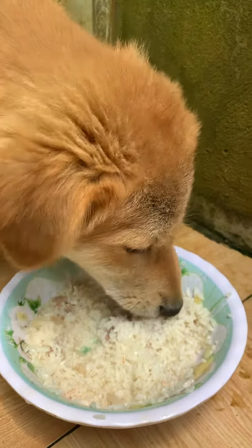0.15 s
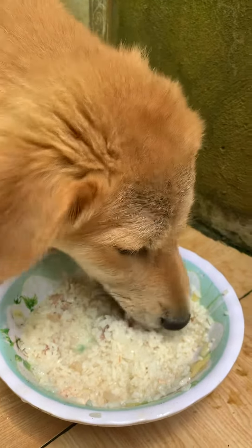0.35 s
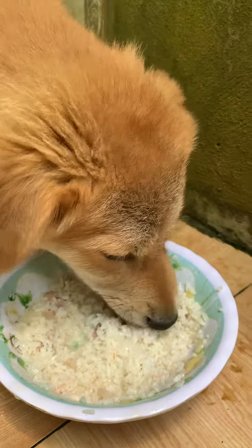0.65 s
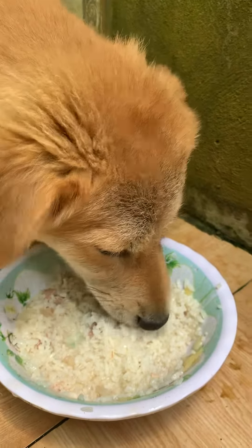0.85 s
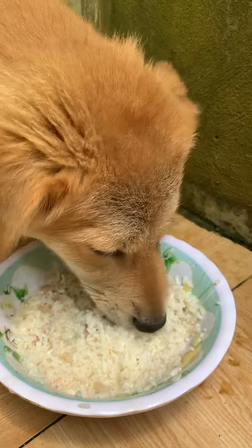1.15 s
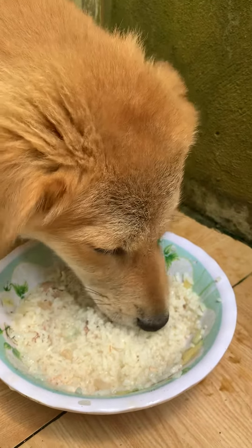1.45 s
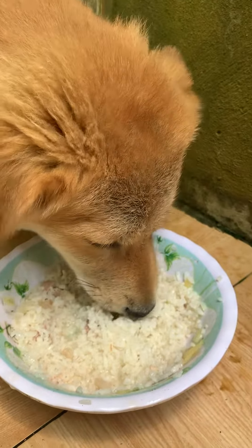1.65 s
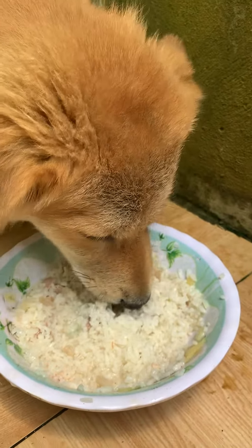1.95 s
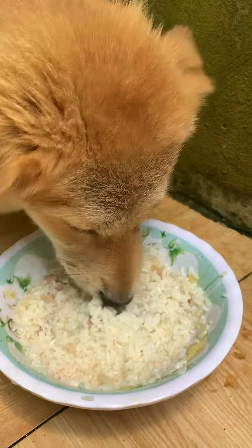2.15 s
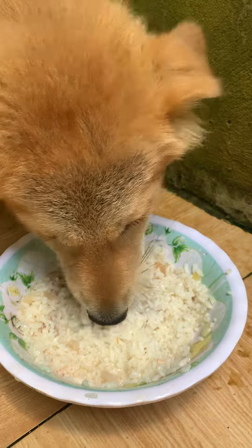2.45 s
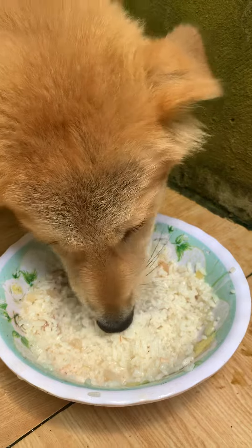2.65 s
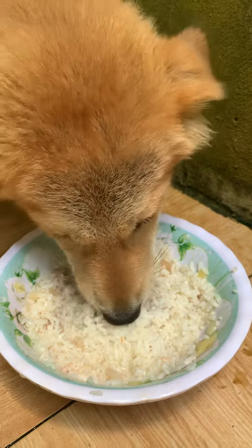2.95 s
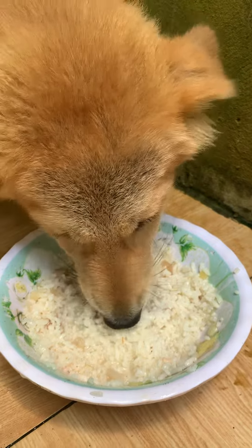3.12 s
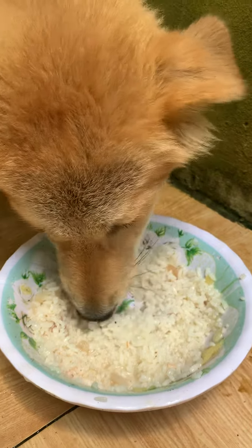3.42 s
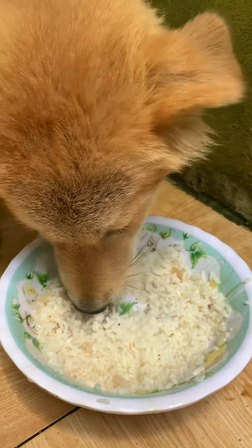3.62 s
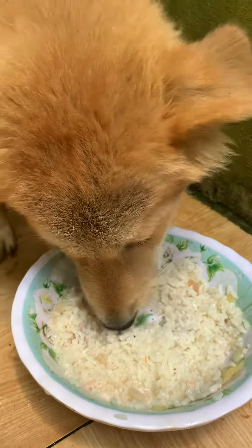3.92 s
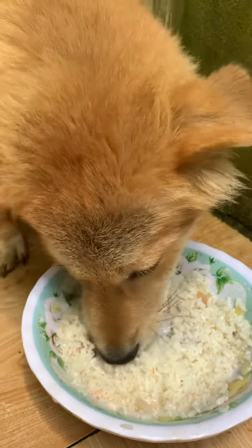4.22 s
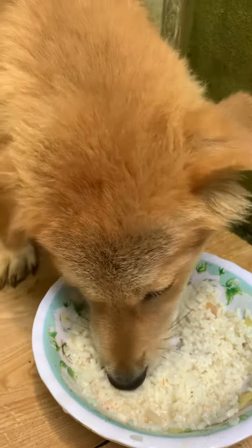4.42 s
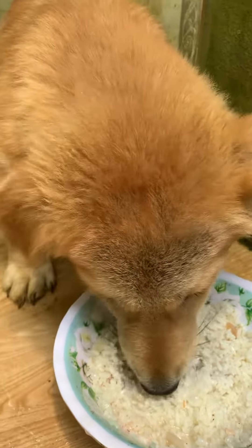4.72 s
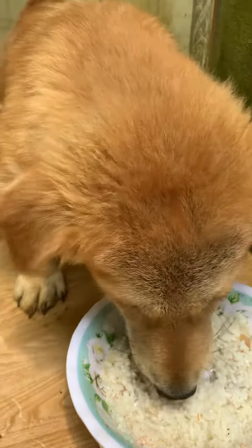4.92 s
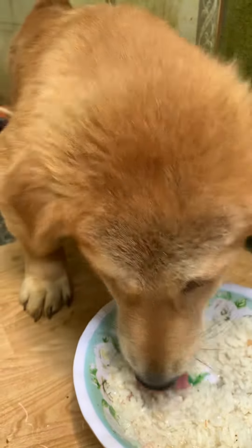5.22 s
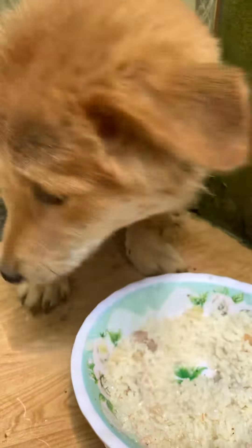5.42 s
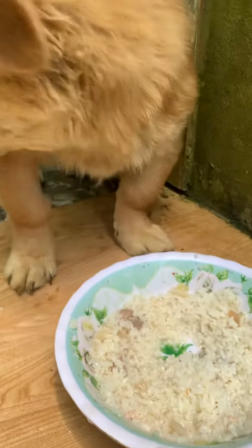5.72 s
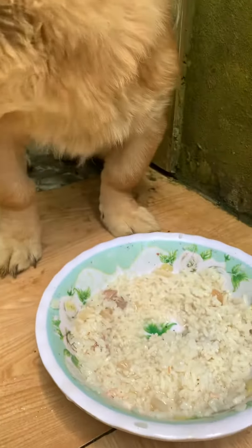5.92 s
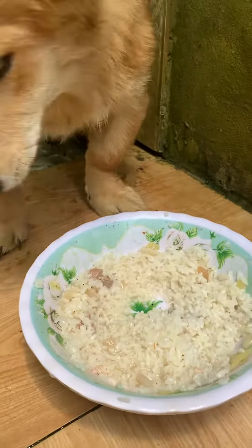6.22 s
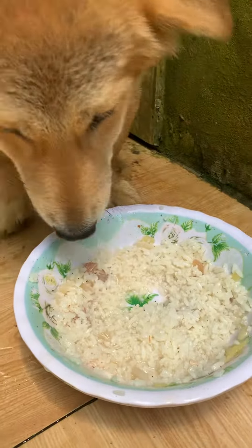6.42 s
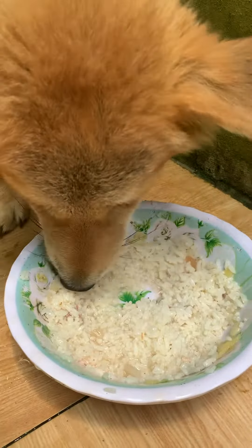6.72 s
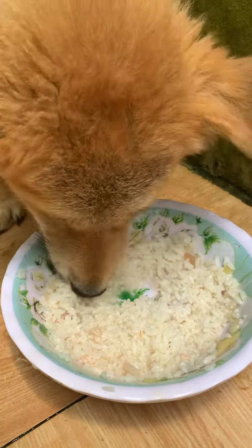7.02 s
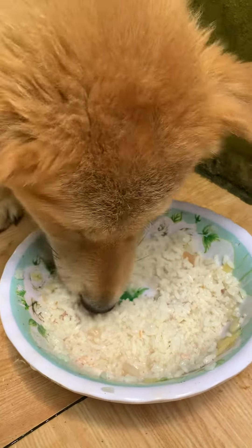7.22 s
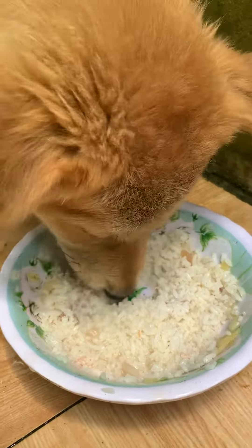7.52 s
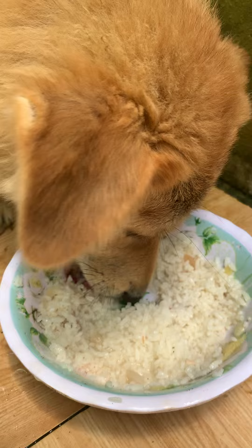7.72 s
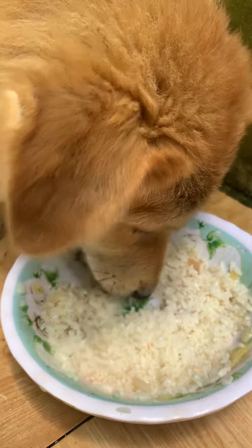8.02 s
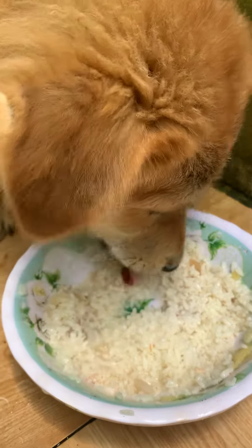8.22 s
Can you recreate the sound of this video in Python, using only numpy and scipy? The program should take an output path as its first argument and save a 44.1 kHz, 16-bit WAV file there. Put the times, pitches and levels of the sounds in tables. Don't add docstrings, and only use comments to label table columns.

```python
import sys
import numpy as np
from scipy import signal
from scipy.fft import rfft, irfft, next_fast_len
from scipy.io import wavfile
from scipy.ndimage import uniform_filter1d

SR = 44100
rng = np.random.default_rng(int(sys.argv[2]) if len(sys.argv) > 2 else 0)


def linear_from_db(decibels):
    return 10 ** (np.asarray(decibels, float) / 20)


def file_out(sig):
    cols = np.atleast_2d(sig).T
    lim = np.clip(cols, -1, 1)
    pcm = np.round(lim * 32767).astype(np.int16)
    wavfile.write(sys.argv[1], SR, pcm)


N = 368656
T = np.arange(N) / SR
HZ = np.maximum(np.fft.rfftfreq(N, 1 / SR), 1)

# time [s], peak level [dB], cavity pitch [Hz].
TONGUE_DRAGS = [(0.881, -44, 1090), (1.462, -37, 1200), (1.827, -36, 1620), (1.987, -48, 720),
                (1.738, -37, 1490), (2.012, -42, 900), (3.764, -38, 1450), (2.203, -43.5, 870),
                (2.289, -39.5, 1050), (3.193, -36, 1516), (3.383, -37, 1870), (3.466, -29.5, 1540),
                (3.573, -42, 1465), (3.664, -34, 1150), (3.748, -29, 1390), (4.755, -44, 1462),
                (4.902, -45, 1630), (5.025, -40, 1400), (5.052, -35, 1000), (5.232, -40, 720),
                (5.653, -50, 1320), (5.735, -47, 1430), (5.961, -43, 710), (7.447, -40, 1115),
                (7.662, -43, 930), (8.287, -44, 651)]
# centre [Hz], width [Hz], level [dB].
MOUTH_MODES = [(780, 215, 0), (1100, 173, 0), (1450, 210, -0.5), (1780, 200, -5), (2400, 410, 1.5)]
# time [s], firing rate [Hz], load level [dB].
VEHICLE = [(0, 31.94, -34.5), (1, 33.17, -39.5), (2, 34.05, -35), (2.5, 34.36, -38.5), (2.9, 34.52, -46),
           (3.9, 34.45, -44), (4.6, 37.36, -37.5), (5.2, 39.17, -39.5), (5.8, 42.18, -39.5),
           (6.3, 44.5, -44.5), (6.9, 49.3, -35.5), (7.2, 52.1, -40), (7.5, 47.95, -40.5), (7.8, 45.5, -67)]


def rms_one(x):
    return x / np.sqrt(np.mean(x ** 2) + 1e-20)


def in_time(rows):
    s, *columns = np.transpose(rows)
    return [np.interp(T, s, c) for c in columns], (T >= s[0]) & (T <= s[-1])


def at_hz(points):
    hz, values = np.transpose(points)
    return np.interp(np.log(HZ), np.log(hz), values)


def bells(rows, hz):
    return sum(db / (1 + (2 * (hz - centre) / width) ** 2) for centre, width, db in rows)


def bumps(rows):
    return sum(db * np.exp(-((T - s) / half_s) ** 2) for s, db, half_s in rows)


def drift(rate):
    r = np.exp(-80 * np.pi * rate / SR)
    slow = signal.lfilter([1], [1, -2 * r, r * r], rng.standard_normal(N // 40 + 2002))[2000:]
    return np.interp(np.arange(N) / 40, np.arange(len(slow)), rms_one(slow))


def diffuse_noise(colour):
    # frequency [Hz], left-right likeness [0-1].
    likeness = [(60, .99), (250, .9), (450, .3), (750, .8), (1000, .45), (1300, .7), (1500, .88),
                (2200, .68), (3300, .66), (4150, .82), (4400, .97), (4650, .99), (5100, .995), (5300, .86),
                (6100, .86), (7400, .97), (7700, .84), (8250, .88), (8550, .99), (9300, .99), (9600, .87),
                (10300, .87), (10600, .97), (12000, .82), (15000, .85)]
    shared, apart = rfft(rng.standard_normal((2, N)))
    alike = np.clip(at_hz(likeness), 0, 1)
    pair = np.sqrt(1 + alike) * shared + np.sqrt(1 - alike) * apart * [[1], [-1]]
    return rms_one(irfft(colour * pair, N))


def resonate(x, hz, width_hz):
    r = np.exp(-np.pi * width_hz / SR)
    return signal.lfilter([1, 0, -1], [1, -2 * r * np.cos(2 * np.pi * hz / SR), r * r], x)


def add(out, s, db, sound):
    i = round(s * SR)
    out[i:i + len(sound)] += (linear_from_db(db) * sound / np.abs(sound).max())[:N - i]


def bites():
    # time [s], peak level [dB], cavity pitch [Hz], broad slap [dB].
    lip_pops = [(0.116, -30.5, 1900, -33), (0.402, -33, 1550, 17), (0.587, -39, 1480, 24),
                (0.683, -35.5, 1490, -16), (0.985, -32.5, 1480, -5), (1.009, -31.5, 1440, -17),
                (1.1, -38, 1450, 19), (1.733, -30, 640, 13), (1.816, -30, 1570, -23),
                (1.959, -38.5, 751, -1), (1.999, -24.5, 850, 32), (2.485, -36.5, 1379, 21),
                (2.52, -20, 1450, 22), (2.654, -30.5, 1570, -24), (2.709, -37, 1600, -4),
                (2.779, -33, 1010, -25), (2.805, -29.5, 1770, 16), (2.843, -33, 1260, 27),
                (3.122, -36, 720, -3), (3.331, -29, 749, 22), (3.583, -35.5, 1100, -4.5),
                (4.151, -37.5, 1100, -9), (4.283, -37, 1160, -25), (4.662, -36.5, 1450, 4),
                (4.946, -34.5, 1710, 19), (6.56, -35.5, 1100, -3), (6.77, -39.5, 691, -23),
                (7.203, -27, 1520, -10), (7.47, -33.5, 1570, 3), (8.03, -28.5, 1450, 10),
                (2.107, -28.5, 1380, 13), (2.118, -23, 1350, 8), (7.208, -41.5, 1150, -8),
                (2.009, -33, 900, 7), (2.529, -40.5, 1050, 9), (4.261, -48, 1120, -3)]
    # time [s], peak level [dB], cavity
    # pitch [Hz].
    light_licks = [(0.039, -46, 1200), (0.306, -45, 1170), (1.315, -49, 1350), (1.689, -50, 752),
                   (2.535, -36, 1010), (3.355, -43, 820), (3.689, -40, 740), (1.172, -47, 1420),
                   (1.279, -51, 868), (1.422, -42, 1435), (1.45, -45, 740), (1.635, -45, 745),
                   (2.388, -39.5, 1160), (2.456, -39, 970), (2.575, -34.5, 1140), (2.953, -43, 1330),
                   (4.086, -49, 780), (4.213, -41.5, 1350), (5.148, -45, 1450), (5.884, -43, 740),
                   (6.489, -41.5, 1180), (6.338, -51, 790), (6.461, -49, 680), (6.523, -49, 660),
                   (7.384, -54, 1590), (1.553, -62, 1450), (7.16, -43, 1153), (7.812, -42.5, 1460),
                   (8.32, -41, 1720),
                   (0.572, -58, 1620), (0.737, -47, 1370), (0.965, -48, 1350), (1.069, -48, 1100),
                (1.405, -46, 1410), (1.711, -47.5, 1850), (1.904, -58, 616), (2.162, -44, 790),
                (2.253, -52.5, 1780), (2.296, -40, 1140), (2.31, -47, 805), (2.405, -53, 998),
                (3.043, -47.5, 1690), (3.06, -44, 736), (3.085, -47, 800), (3.175, -51, 1466),
                (3.204, -48, 1430), (3.479, -42, 1300), (3.595, -44, 810), (3.679, -43, 1100),
                (4.686, -47, 1450), (4.869, -42, 1710), (4.95, -42, 650), (5.085, -54, 800),
                (5.136, -54, 773), (5.329, -47, 1100), (5.765, -47, 1780), (6.632, -45, 1395),
                (6.81, -48, 825), (7.567, -49, 1410), (7.679, -52, 800), (7.724, -46, 1350),
                (7.971, -49, 1410), (8.024, -60, 641), (0.2, -57, 850), (1.48, -44, 720),
                (1.677, -56, 1850), (2.627, -47, 1750), (4.063, -48, 872), (5.105, -54, 1810),
                (7.167, -46, 1518), (7.177, -59, 1150), (7.551, -45, 1464), (7.706, -48, 762),
                (3.49, -46, 1500), (3.595, -46, 1500), (5.245, -48, 1300), (8.018, -50, 1940),
                (4.93, -43, 1500), (4.985, -45, 800), (5.04, -43, 1130), (5.068, -46, 860),
                (5.078, -53, 1500), (4.77, -48, 1150)]
    middle_db = np.mean(TONGUE_DRAGS, axis=0)[1]
    pops = [(*row, -15, 0.0076) for row in lip_pops]
    drags = [(s, db, hz, -0.5 + 2.4 * (db - middle_db), -1.5, 0.017) for s, db, hz in TONGUE_DRAGS]
    licks = [(*row, -6.5, -13.5, 0.01) for row in light_licks]
    return pops + drags + licks


def smacks(bowl_echo_s=0.00473, echo=0.035, width_hz=430):
    crack_hz, crack_width_hz, crack_db = 2400, 1000, -13
    lead_s, lead_db = 0.008, -10
    out, t = np.zeros(N), np.arange(2600) / SR
    lag = round(bowl_echo_s * SR)
    leading = t < lead_s
    for s, db, hz, slap_db, squelch_db, squelch_s in bites():
        born = rng.random(len(t)) < 10 / squelch_s / SR
        spread_s = np.where(leading, 0.5 * lead_s, squelch_s)
        swell = linear_from_db(lead_db * leading) * np.exp(-((t - lead_s) / spread_s) ** 2)
        pops = linear_from_db(squelch_db) * rng.standard_normal(len(t)) * born * swell
        pops[round(lead_s * SR)] = 1
        pops = signal.lfilter([1], [1, -0.8], pops)

        slap = np.zeros(len(t))
        for k, (mode_hz, mode_width_hz, mode_db) in enumerate(MOUTH_MODES):
            level_db = mode_db + 3 * rng.standard_normal() - 14 * max(np.log2(hz / mode_hz), 0)
            slap += linear_from_db(level_db) * (-1) ** k * resonate(pops, mode_hz, mode_width_hz)

        cavity = resonate(resonate(pops, hz, width_hz), hz, 0.86 * width_hz)
        crack = resonate(np.diff(pops, prepend=0), crack_hz, crack_width_hz)
        sound = rms_one(cavity) + linear_from_db(slap_db) * rms_one(slap) + linear_from_db(crack_db) * rms_one(crack)
        sound[lag:] += echo * sound[:-lag]
        add(out, s - 0.7 * lead_s, db, sound)
    return out


def ticks(width_hz=3000, narrowing=0.4, broad_db=-8):
    # time [s], peak level [dB], centre [Hz].
    thread_snaps = [(1.8173, -32.5, 14700), (4.2607, -35, 14800), (4.8693, -39.5, 11600),
                    (6.1579, -36, 14330), (7.1584, -39, 14350), (7.4525, -38, 14700), (7.4624, -48, 13300),
                    (7.7204, -40, 15300), (7.9748, -40, 6600), (7.9755, -35, 14900), (7.8155, -32, 2800),
                    (8.027, -40, 6300), (8.0333, -37, 2380), (8.075, -42, 8700), (8.082, -51, 2600),
                    (8.1434, -53, 3040), (8.205, -47, 2700), (8.2162, -48, 5830), (8.2254, -42, 5560),
                    (8.2262, -49, 13500), (8.3035, -49, 15000), (8.2774, -59, 2930), (8.2834, -42, 3360),
                    (8.2878, -34.5, 2270), (8.29, -41, 6540), (8.2974, -49, 2410), (8.3104, -54, 6130),
                    (8.3274, -54, 2320), (8.3355, -51, 2890), (0.3785, -42, 14500), (0.4045, -29, 14500),
                    (0.8046, -43, 14500), (2.3885, -43, 14500), (2.8429, -44, 14500), (3.5653, -44, 14500),
                    (4.355, -43, 14300), (5.1492, -45, 14500), (5.238, -42, 14440), (7.6046, -48, 14300),
                    (7.765, -32, 6160), (8.3205, -49, 2600), (8.076, -56, 12000), (8.0765, -48, 4000),
                    (8.108, -54, 3100), (8.216, -50, 1800), (8.2165, -61, 11500), (8.226, -49, 2000),
                    (8.206, -58, 12000), (8.2745, -59, 13000), (8.3285, -53, 14000), (8.0435, -56, 7000),
                    (8.122, -69, 7000), (8.16, -70, 6500)]
    out, t = np.zeros(N), np.arange(400) / SR
    for s, db, hz in thread_snaps:
        snap = rng.standard_normal(len(t)) * np.exp(-t / 0.0015)
        width = min(width_hz, narrowing * hz)
        centre = resonate(resonate(snap, hz, width), hz, 2 * width)
        edge = np.diff(snap, prepend=0)
        add(out, s, db, rms_one(centre) + linear_from_db(broad_db) * rms_one(edge))
    return out


def nudges(push_s=0.021, width_hz=45):
    # time [s], peak level [dB], ring pitch [Hz].
    snout_pushes = [(1.824, -42.5, 314), (1.959, -52, 307), (2.094, -42, 261), (2.14, -42.5, 294),
                    (2.493, -42.5, 230), (2.521, -44.5, 331), (2.88, -51, 197.2), (3.194, -43, 287),
                    (3.333, -47.5, 298), (3.467, -44, 309), (3.509, -37, 274), (3.535, -41, 295),
                    (3.801, -31, 275), (4.275, -51, 200), (5.082, -48, 277), (5.242, -42.5, 322),
                    (6.352, -46.5, 276), (6.529, -38, 182), (6.77, -38.5, 184), (7.097, -45, 217),
                    (6.772, -43.5, 307), (7.098, -48, 311), (5.7, -45, 297), (5.73, -57, 397),
                    (6.53, -52, 317), (5.245, -52, 260)]
    out, t = np.zeros(N), np.arange(4000) / SR
    push = t / push_s * np.exp(-t / push_s)
    for s, db, hz in snout_pushes:
        add(out, s, db, resonate(resonate(np.gradient(push), hz, width_hz), hz, 2.8 * width_hz))
    return out


def mush(grains_per_s=220, settle_s=0.06):
    stirred = sum(np.exp(-((T - s) / settle_s) ** 2) for s, *_ in TONGUE_DRAGS)
    db = -75 + 14 * np.tanh(stirred / 2)
    born = rng.random(N) < grains_per_s * linear_from_db(4.0 * drift(12.0)) / SR
    middle, side = rng.standard_normal((2, N)) * born
    pops = middle + 0.5 * side * np.array([[1], [-1]])
    rings = sum(linear_from_db(level_db + 2.5 * drift(4.1)) * resonate(pops, hz, 1.1 * width)
                for hz, width, level_db in MOUTH_MODES)
    return linear_from_db(db + 5.5) * rms_one(rings)


def corner(x, t60=0.11):
    t = np.arange(int(0.3 * SR)) / SR
    tail = rng.standard_normal((2, len(t))) * linear_from_db(-60 * t / t60) * (t > 0.004)
    tail /= np.sqrt((tail ** 2).sum(axis=1, keepdims=True))
    return signal.fftconvolve(x[None], tail, axes=1)[:, :N]


def swing(back_s, out_s=0.23):
    # start [s], how far it drops [0-1].
    pitch_drops = [
        (0.86, 0.75),
        (3.6, 0.81),
        (5.27, 0.33),
        (6.26, 1),
    ]
    next_starts = [s for s, _ in pitch_drops[1:]] + [N]
    dropped = np.zeros(N)
    for (s, far), again in zip(pitch_drops, next_starts):
        dropping = np.clip((T - s) / out_s, 0, 1)
        easing = np.exp(-np.maximum(T - s - out_s, 0) / back_s)
        handing_over = np.clip(1 - (T - again) / out_s, 0, 1)
        dropped += far * dropping * easing * handing_over
    return dropped


def streaks(x, low_db, high_db, shimmer=1.7):
    hz, _, cells = signal.stft(x, SR, nperseg=2048)

    def smooth_field(*spans):
        field = rng.standard_normal(cells.shape[1:])
        for axis, size in spans:
            field = uniform_filter1d(field, size=size, axis=axis)
        return rms_one(field)

    creeping = smooth_field((0, 3), (1, 16), (1, 16))
    field = rms_one(creeping + shimmer * smooth_field((0, 3), (1, 3)))
    depth_db = np.interp(hz, [1500, 2200, 5500, 9000, 14000], [0, low_db, low_db, high_db, high_db + 2])
    depth_db = depth_db[:, None]
    cells = cells * linear_from_db(depth_db * field) / linear_from_db(depth_db ** 2 / 8.7)
    return signal.istft(cells, SR, nperseg=2048)[1][:, :N]


def cicada(flutter_db=-0.3039, doorway_hz=1300):
    # frequency [Hz], density [dB per Hz].
    body_colour = [(1300, -29), (1750, -16), (2100, -10), (2700, -3), (3300, -3.5), (3900, 0.5),
                   (4500, -3.5), (6000, -7.5), (9000, -11), (12000, -20), (14500, -20.5), (15500, -23)]
    middle_colour = [(3500, -25.5), (4300, -21.5), (5000, 2), (5700, 0.5), (6800, -11), (8000, -32)]
    bright_colour = [(4500, -32.5), (5600, -9), (6500, -4), (7800, -2.5), (8800, 0.5), (9600, -0.5),
                     (10500, -9.5), (11500, -28)]
    top_colour = [(9000, -15.5), (10200, 6.5), (11000, 6), (12000, 0), (13500, -10), (15500, -18)]
    # level before any drop [dB], change at the spring [dB], change at the creep [dB],
    layers = [
        (-1, 2.5, 2, 0.67),
        (-2, -2.5, 4, 0.78),
        (6.5, -13.5, -6, 0.75),
        (-1, -12.5, -18, 1),
    ]
    # centre [Hz], width [Hz], lift [dB].
    whistles = [(2110, 60, 4), (2648, 40, 6), (2890, 25, 4), (3029, 30, 4), (3150, 50, 4), (3490, 30, 4),
                (3649, 30, 4), (3736, 30, 4), (3983, 40, 4), (4500, 40, 4), (4898, 40, 5), (5846, 50, 5),
                (6128, 40, 4), (6490, 50, 4), (6694, 60, 3), (7020, 50, 3), (7375, 30, 3), (7757, 25, 3),
                (8022, 50, 3), (10673, 40, 4), (3813, 25, 3), (8684, 50, 4), (9248, 50, 4)]
    # time [s], level [dB].
    call_level = [(0, -39.5), (0.9, -38.5), (2, -40), (3.6, -38.5), (4.3, -41.5), (5.27, -48), (6.26, -48.5),
                  (7.2, -50), (7.945, -55.5), (7.99, -72), (8.1, -100), (8.36, -101)]
    # frequency [Hz], level [dB].
    scatter_colour = [(3900, -30), (4350, 0), (5100, -2), (5500, -30)]
    # middle [s], rise [dB], half length [s].
    side_swells = [
        (1.45, 10, 0.03),
        (3.75, 6, 0.12),
        (4.25, 12, 0.08),
        (5.5, 10, 0.1),
        (6.45, 6, 0.07),
    ]

    walls = linear_from_db(bells(whistles, HZ)) / np.sqrt(1 + (doorway_hz / HZ) ** 6)
    (call_db,), sounding = in_time(call_level)
    start_db, fall_db = call_db[0], call_db - call_db[0]
    spring, creep = swing(back_s=0.14), swing(back_s=1)
    together = drift(11.0)
    hiss = np.zeros((2, N))
    colours = (body_colour, middle_colour, bright_colour, top_colour)
    for (db, spring_db, creep_db, follow), colour in zip(layers, colours):
        level_db = start_db + follow * fall_db + db + spring_db * spring + creep_db * creep
        level_db = level_db + flutter_db * (together + 2.1 * drift(3.1))
        hiss += linear_from_db(level_db) * diffuse_noise(linear_from_db(at_hz(colour)) * walls)

    side = irfft(rfft(rng.standard_normal(N)) * linear_from_db(at_hz(scatter_colour)), N)
    side_db = start_db + 0.67 * fall_db - 30 + bumps(side_swells)
    side_db = side_db + 8 * (spring + 0.3 * creep) + 2.0 * drift(6.5)
    hiss += linear_from_db(side_db) * rms_one(side) * [[1], [-1]]
    return sounding * streaks(hiss, 4.0, 4.2)


def engine(rows, orders_db, wobble=0.003):
    wall_pass_hz, wall_db_per_octave, wall_most_db = 47.6, 63, -21
    # centre [Hz], width [Hz], lift [dB].
    booms = [(69.1, 3.1, 5.5), (128.3, 30, 10)]
    (hz, load_db), sounding = in_time(rows)
    phase = 2 * np.pi * np.cumsum(hz * (1 + wobble * drift(1.77))) / SR
    tone = np.zeros(N)
    for k, order_db in enumerate(orders_db):
        order_hz = (k + 1) * hz
        wall_db = np.clip(wall_db_per_octave * np.log2(order_hz / wall_pass_hz), wall_most_db, 0)
        level_db = load_db + order_db + wall_db + bells(booms, order_hz) - 0.5 + 2.0 * drift(4.8)
        tone += linear_from_db(level_db) * np.sin((k + 1) * phase + k)
    return tone * uniform_filter1d(sounding * 1., size=4000)


def motors():
    # time [s], firing or turning rate [Hz], level [dB].
    idling = [
        (4.2, 66.6, -59),
        (5, 66.5, -45.5),
        (5.8, 64.2, -59),
        (6.5, 63.35, -48),
        (7.4, 61.46, -41.5),
        (7.8, 61.3, -49.5),
        (8.05, 61.5, -39),
        (8.36, 64.7, -44),
    ]
    far_fan = [
        (0, 54.47, -53.5),
        (1.5, 55.68, -53.5),
        (4, 54.8, -52),
        (5.5, 56.84, -61.5),
        (6.5, 55.2, -43.5),
        (8.36, 57.62, -82),
    ]
    machine_hum = [
        (0, 195, -65),
        (4.5, 190.5, -61),
        (8.36, 196.3, -67.5),
    ]
    vehicle = engine(VEHICLE, [0.5, -9.5, -23, -25])
    return vehicle + engine(idling, [0.0]) + engine(far_fan, [-0.5, -6.5, -14]) + engine(machine_hum, [0.0])


def background():
    # frequency [Hz], density [dB per Hz].
    street_colour = [(12, -51), (20, -33), (49, -5.5), (81, -1.5), (152, -7), (238, -18.5), (330, -19.5),
                     (430, -38.5), (730, -70)]
    air_colour = [(500, -17), (800, 10), (1100, 4.5), (2700, 3.5), (3800, -26), (8000, -25), (12000, -22),
                  (15500, -5)]
    rustle_colour = [(250, -25), (350, -4), (560, 0), (750, -8), (1000, -30)]
    hiss_colour = [(3000, -30), (5000, -6), (12000, -3), (14000, 0), (15800, 0)]
    # middle [s], rise [dB], half length [s].
    yard_rustles = [(1.76, 12, 0.16), (0.752, 7.5, 0.49), (2.9, 3, 0.58), (3.655, 5.5, 0.54),
                    (4.2, -2, 0.078), (4.682, 12, 0.38), (5.11, 5.5, 0.19), (5.68, 13, 0.16),
                    (6.397, 6.5, 1), (7.1, 4, 0.12), (7.604, -1, 0.1594), (8.2, 2, 0.6)]
    # middle [s], drop [dB], half length [s].
    lulls = [
        (0.1, -2, 0.1),
        (0.28, -3, 0.035),
        (1.2, -2, 0.054),
        (1.38, -8, 0.044),
        (2.27, -7, 0.03),
        (4.22, -10, 0.05),
        (4.6, -0.5, 0.17),
        (5.46, -6, 0.06),
        (7.0, -4, 0.32),
        (8.17, -4.5, 0.08),
    ]
    (firing_hz, _), _ = in_time(VEHICLE)
    rev_db = 3.5 * np.log2(firing_hz / firing_hz.mean())
    lull_db = bumps(lulls)
    street_db = -52 + rev_db + 2.5 + 0.99 * drift(8.6)
    rustle_db = -75 + bumps(yard_rustles) + lull_db + 3.0 * drift(8.1)
    air_db = -64 + lull_db + 0.8 * drift(2.9)
    street = linear_from_db(street_db) * diffuse_noise(linear_from_db(at_hz(street_colour)))
    rustle = linear_from_db(rustle_db) * diffuse_noise(linear_from_db(at_hz(rustle_colour)))
    faint_hiss = linear_from_db(-79) * diffuse_noise(linear_from_db(at_hz(hiss_colour)))
    air = linear_from_db(air_db) * diffuse_noise(linear_from_db(at_hz(air_colour)) * (HZ > 300))
    return street + rustle + faint_hiss + air


def patches(x):
    patch_hz, patch_db = [150, 300, 700, 1800, 2600], [0, 3, 4, 3.5, 0]
    hz, _, cells = signal.stft(x, SR, nperseg=1024)
    low = hz < patch_hz[-1]
    field = rng.standard_normal((low.sum(), cells.shape[2]))
    for axis, size in ((0, 5), (0, 4), (1, 10), (1, 8)):
        field = uniform_filter1d(field, size=size, axis=axis)
    depth_db = np.interp(hz[low], patch_hz, patch_db)[:, None]
    cells[:, low] *= linear_from_db(depth_db * rms_one(field) - depth_db ** 2 / 8.7)
    return signal.istft(cells, SR, nperseg=1024)[1][:, :N]


def scene():
    dog = smacks() + nudges()
    snaps = ticks()
    reflections = corner(linear_from_db(-9.0) * dog + linear_from_db(-18) * snaps)
    return dog + snaps + reflections + motors() + patches(mush() + cicada() + background())


def roll_off(x):
    return signal.sosfilt(signal.butter(12, 16860, fs=SR, output="sos"), x)


def record(dry):
    # frequency [Hz], lag of the right channel [radians].
    right_lag = [(0, 0), (380, 0), (530, 2.0), (700, .7), (920, .1), (1040, 1.8), (1200, .4), (1520, 0),
                 (2050, .8), (2300, 1.7), (2480, 2.6), (2670, 2.2), (2850, 1), (3020, .7), (3190, 1.6),
                 (3360, .9), (4700, np.pi), (6880, 2 * np.pi), (8900, 3 * np.pi), (11050, 4 * np.pi),
                 (13100, 5 * np.pi), (16000, 20.3)]
    # frequency [Hz], right over left [dB].
    right_balance = [(50, .8), (280, 3), (400, 1), (1000, 1), (1500, 0), (16000, 0)]
    # centre [Hz], width [Hz], change [dB].
    reflection_dips = [(1010, 70, -7), (1080, 60, 4), (1280, 80, -7), (1400, 90, 2), (1550, 110, -6),
                       (1900, 80, -4), (1970, 50, 3), (2450, 110, -3)]
    # from [Hz], to [Hz].
    antiphase_bands = [(8720, 9080), (12830, 13750)]
    # from [Hz], to [Hz].
    in_phase_bands = [(6220, 7400), (10700, 11600)]

    size = next_fast_len(N + 4096)
    hz = np.fft.rfftfreq(size, 1 / SR)
    lag = np.interp(hz, *np.transpose(right_lag))
    lag -= 0.22 * np.sin(2 * lag) * (hz > 3700)
    half = np.array([[-0.5], [0.5]])
    balance = linear_from_db(half * np.interp(hz, HZ, at_hz(right_balance)))
    ports = balance * np.exp(-1j * half * lag) * linear_from_db(bells(reflection_dips, hz))
    pair = rfft(dry, size) * ports * (hz < 15800)
    middle = pair.mean(axis=0)
    cancelled = sum((hz > low) & (hz < high) for low, high in antiphase_bands)
    agreed = sum((hz > low) & (hz < high) for low, high in in_phase_bands)
    heard = irfft(pair - cancelled * middle - agreed * (pair - middle), size)[:, :N]
    return roll_off(heard)


dry = scene()
out = record(dry)
file_out(out)
```